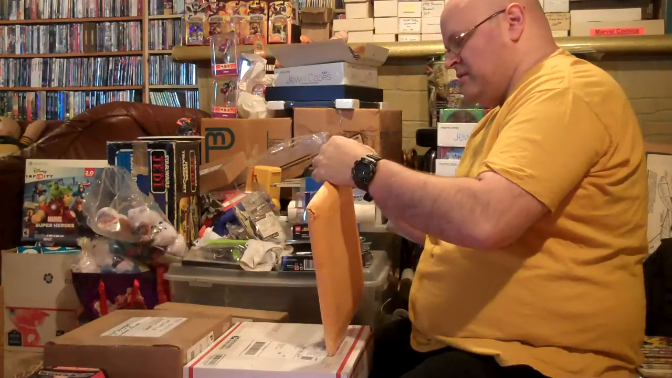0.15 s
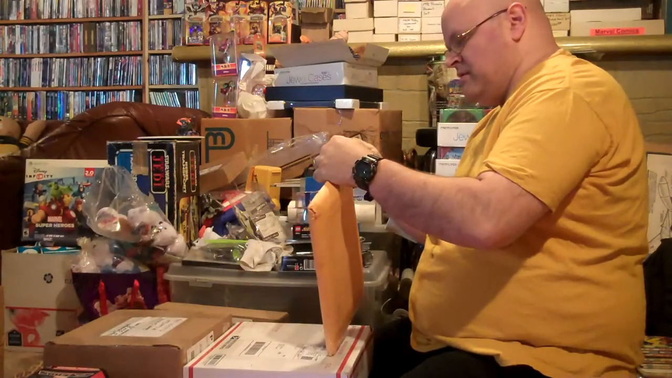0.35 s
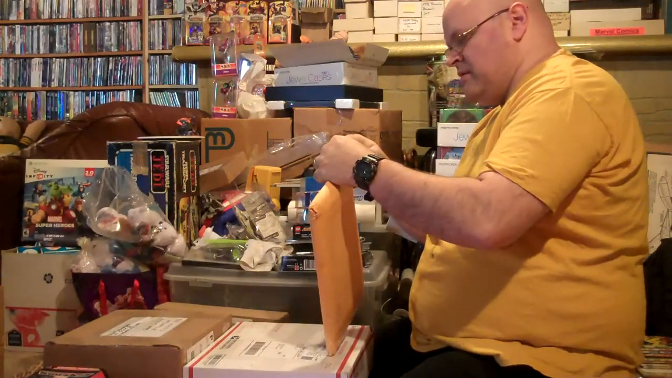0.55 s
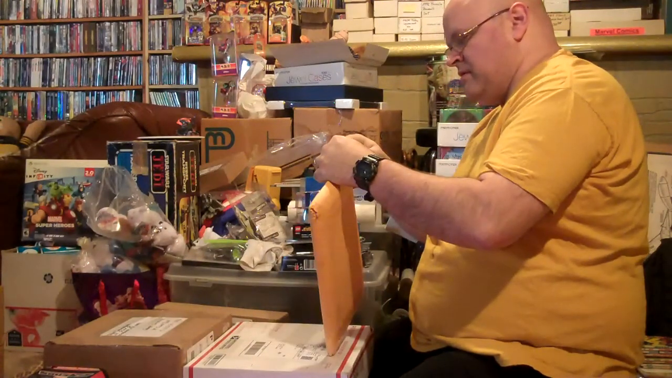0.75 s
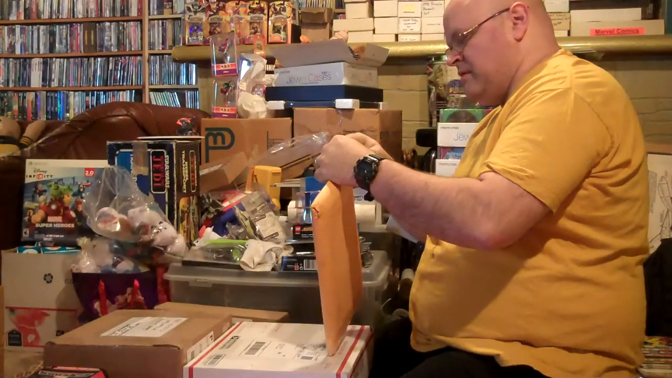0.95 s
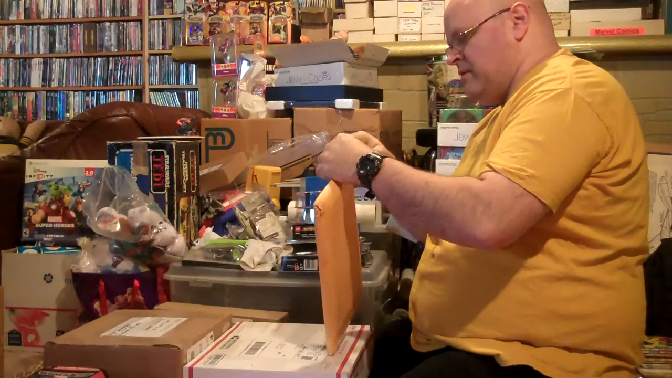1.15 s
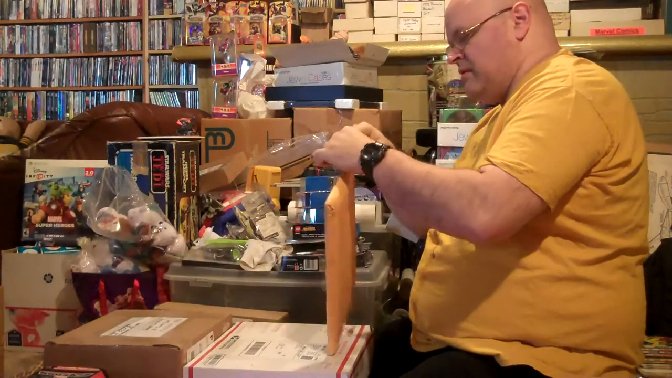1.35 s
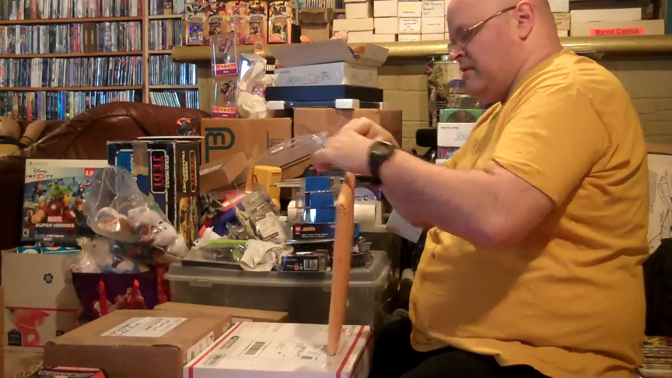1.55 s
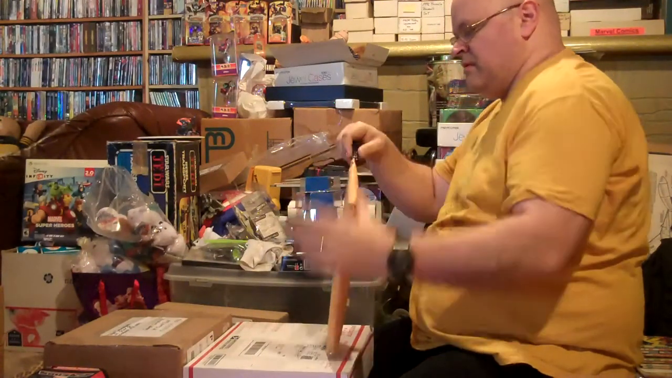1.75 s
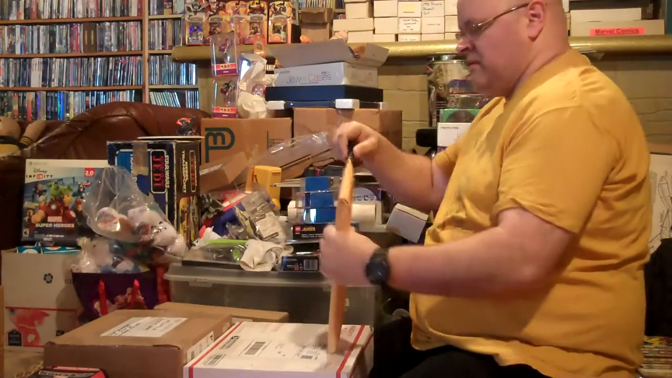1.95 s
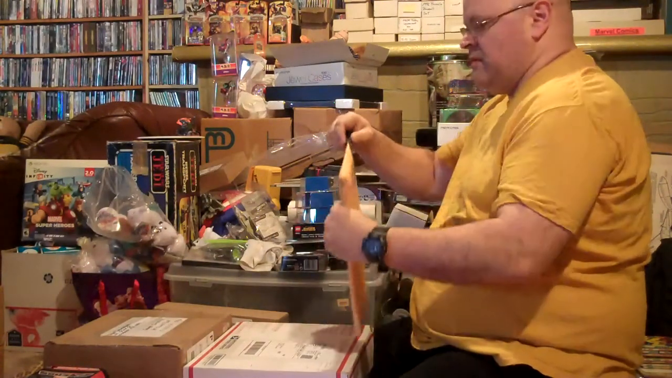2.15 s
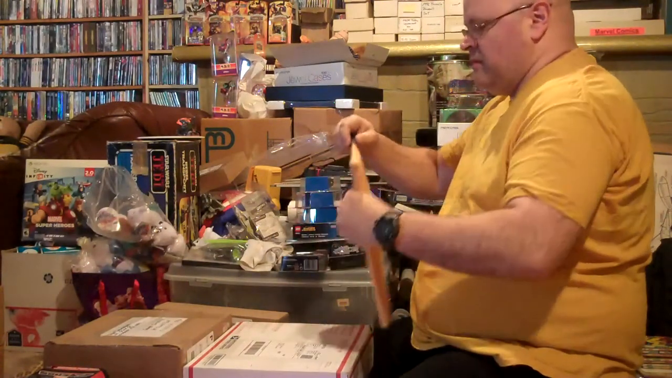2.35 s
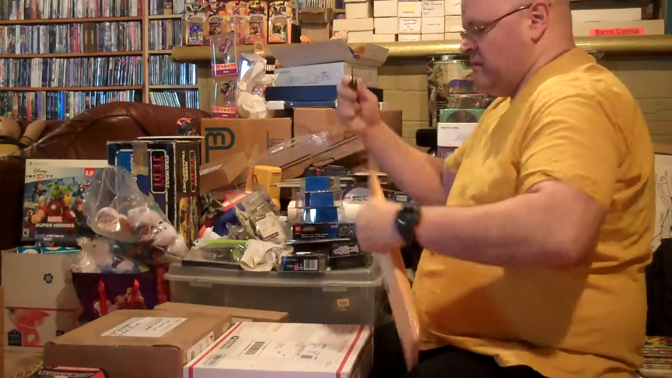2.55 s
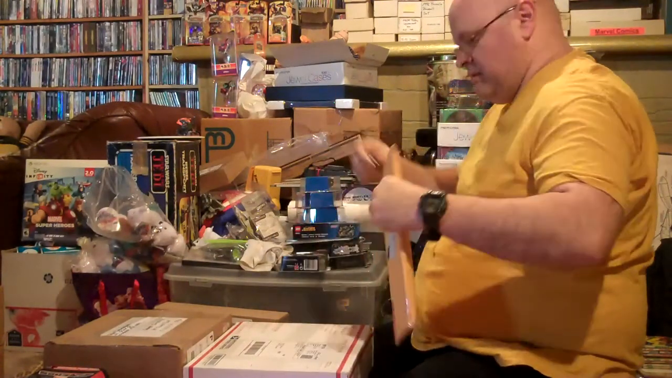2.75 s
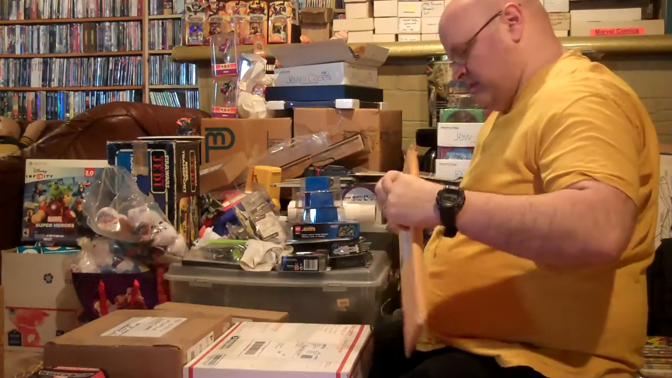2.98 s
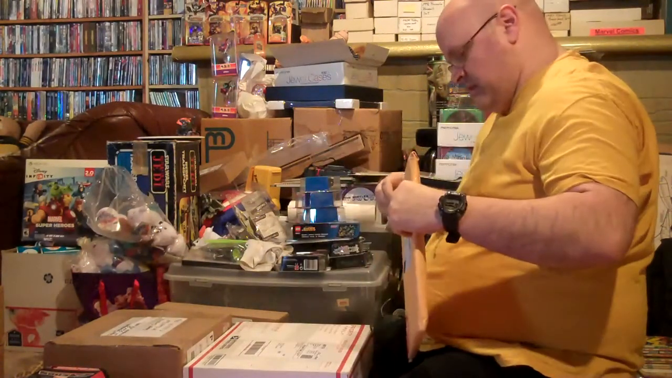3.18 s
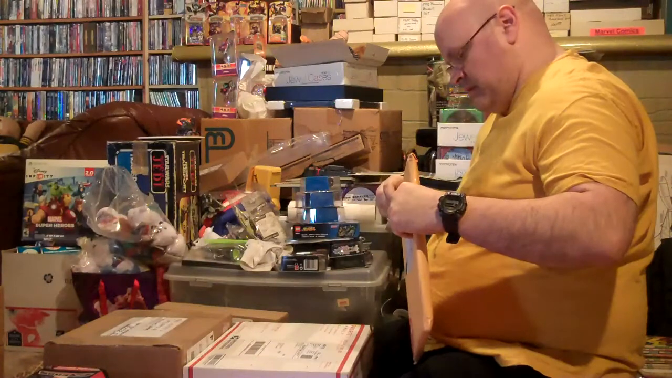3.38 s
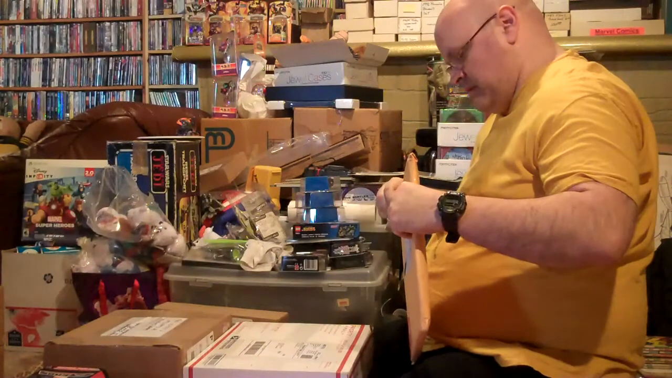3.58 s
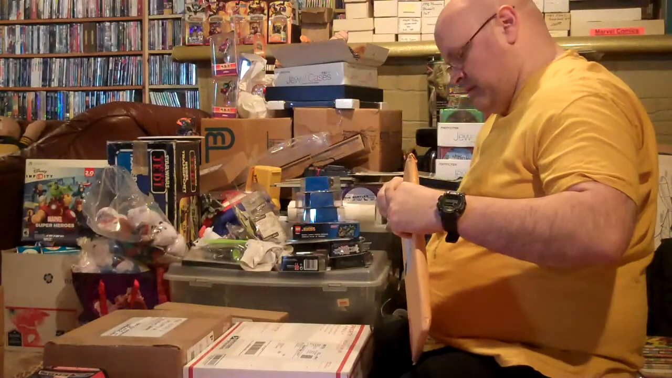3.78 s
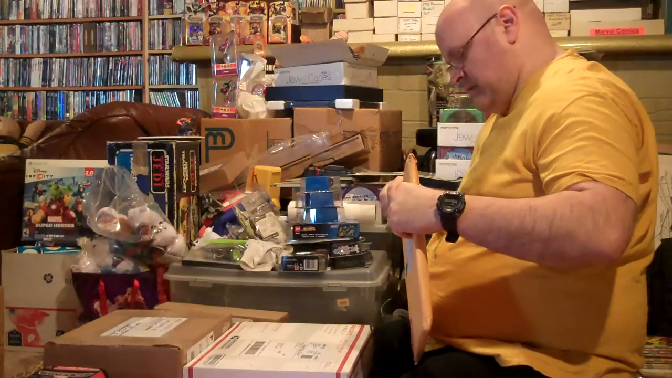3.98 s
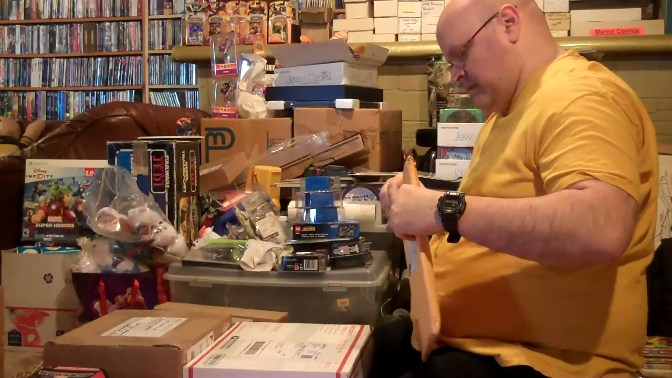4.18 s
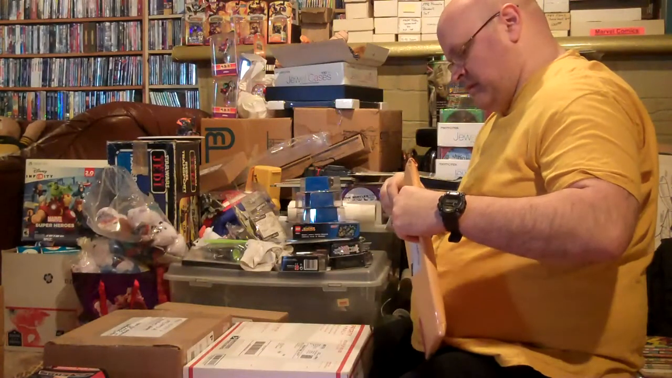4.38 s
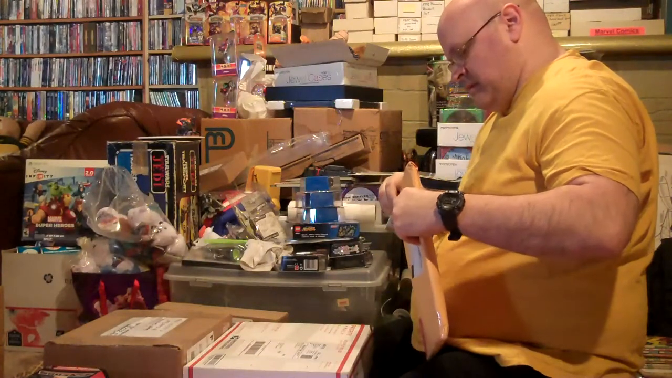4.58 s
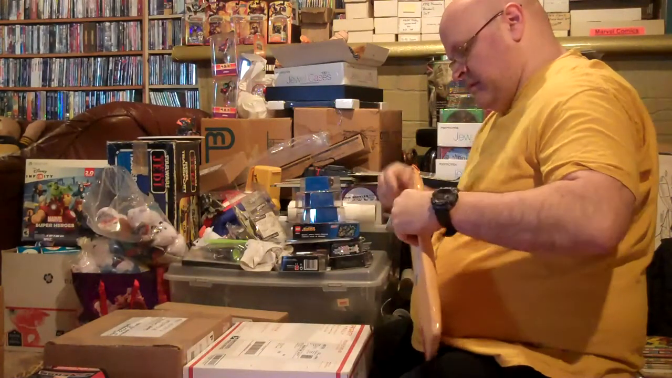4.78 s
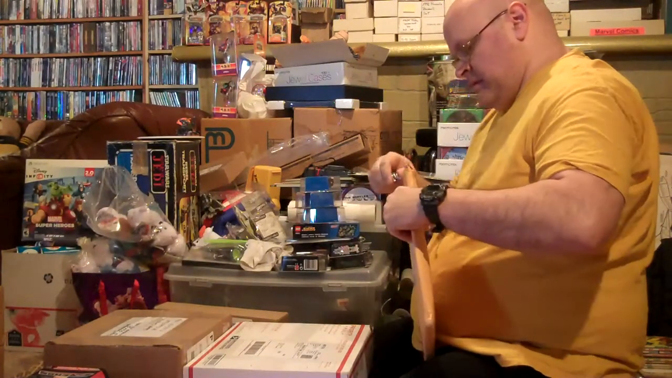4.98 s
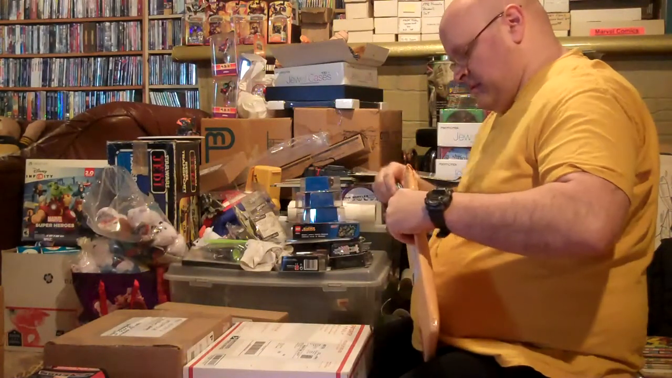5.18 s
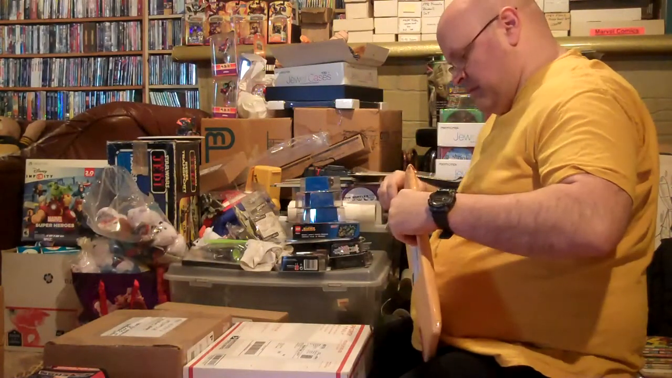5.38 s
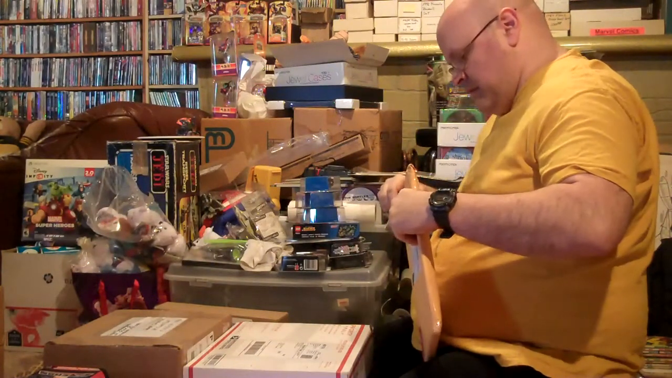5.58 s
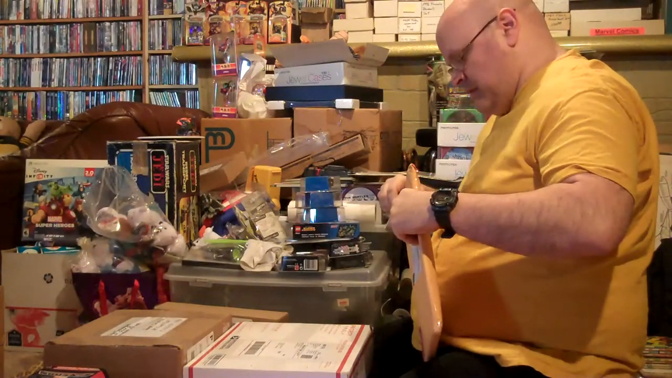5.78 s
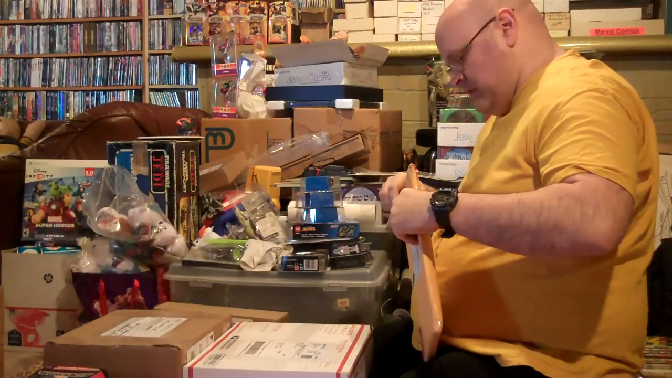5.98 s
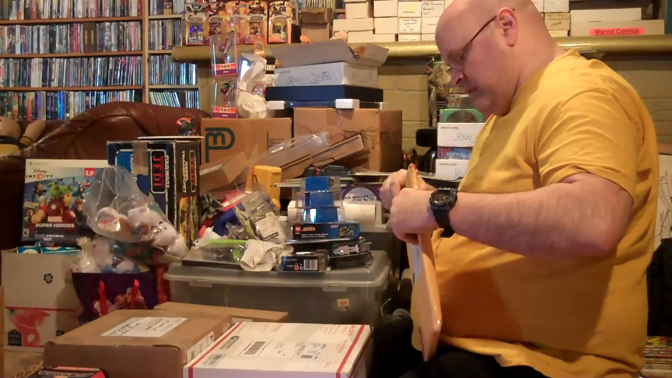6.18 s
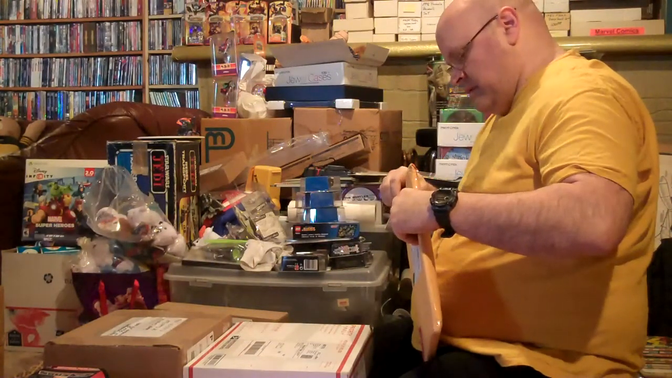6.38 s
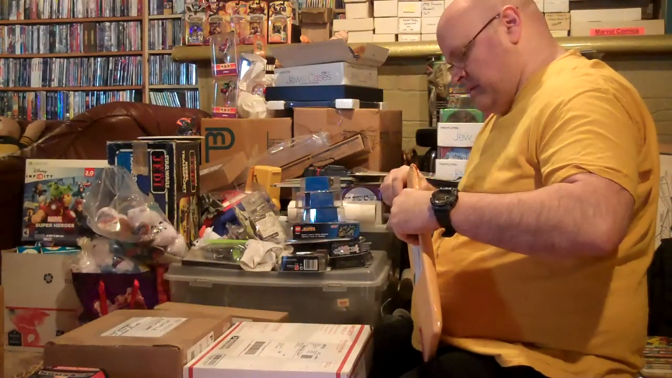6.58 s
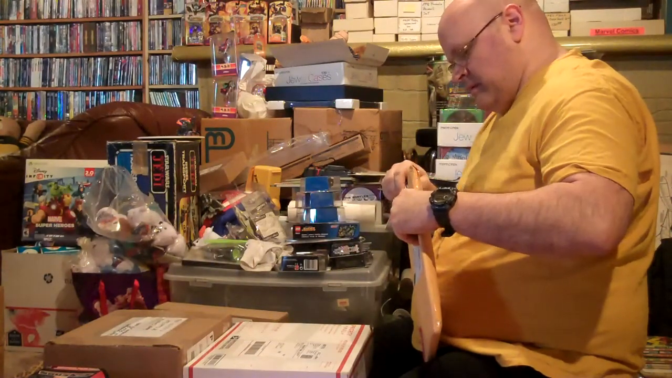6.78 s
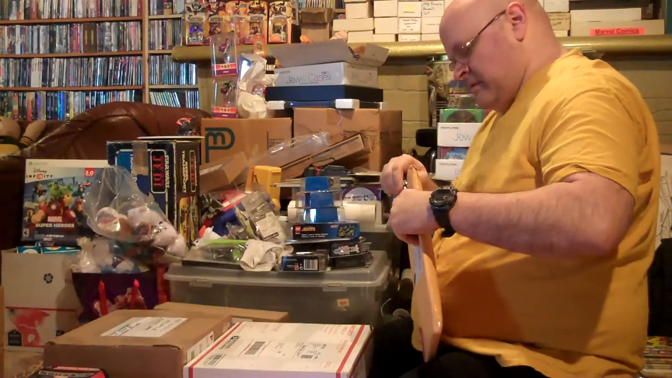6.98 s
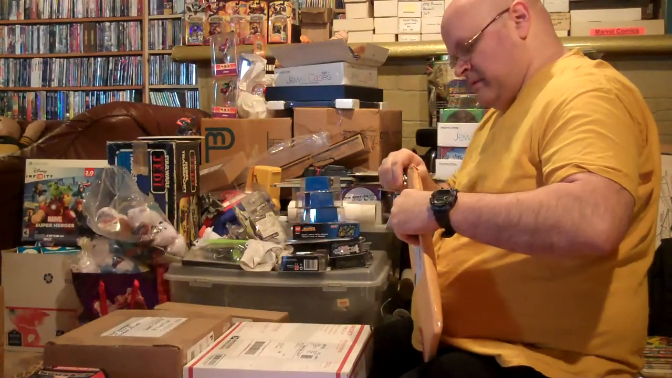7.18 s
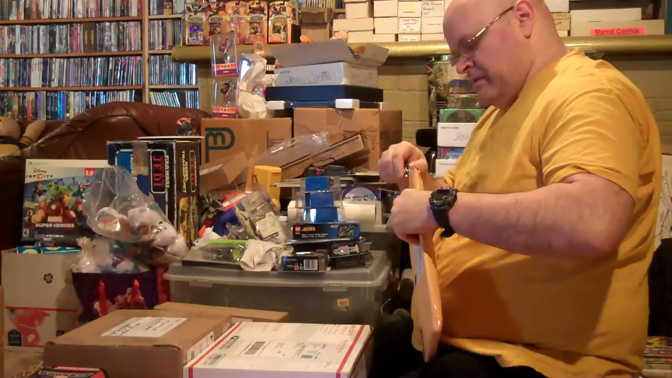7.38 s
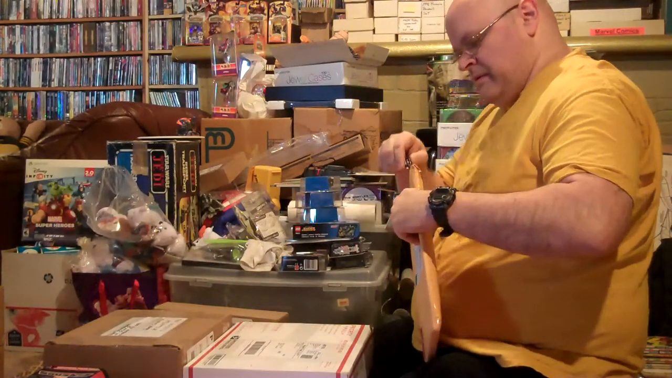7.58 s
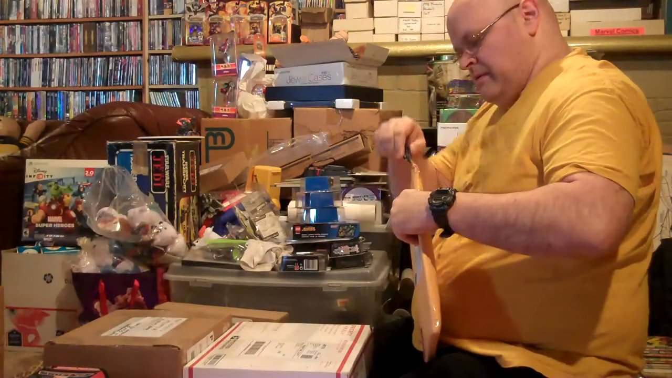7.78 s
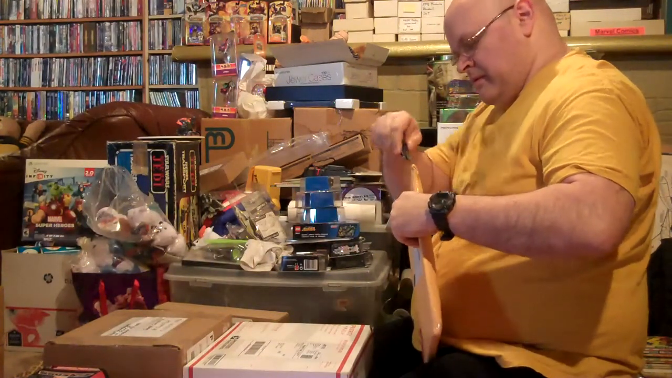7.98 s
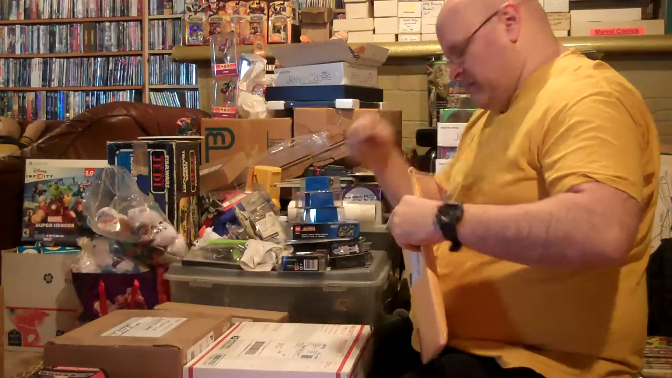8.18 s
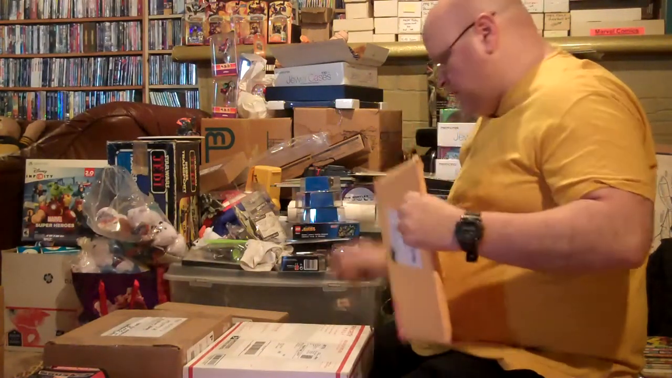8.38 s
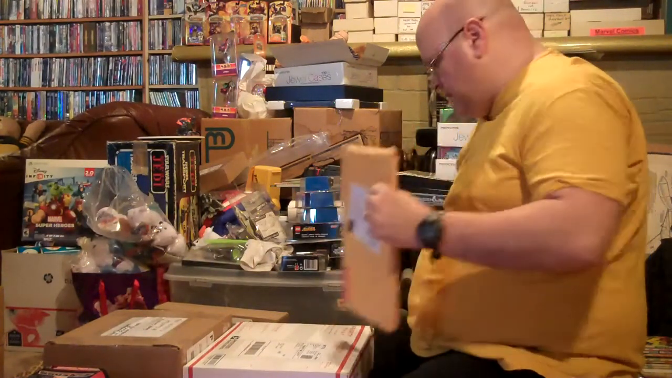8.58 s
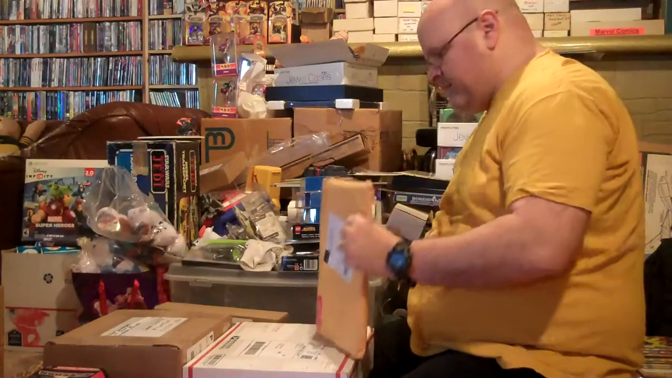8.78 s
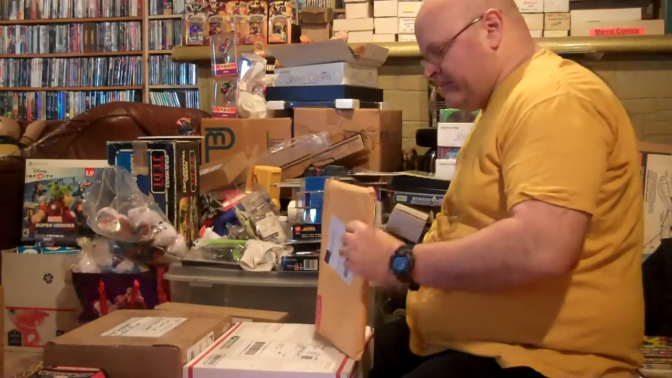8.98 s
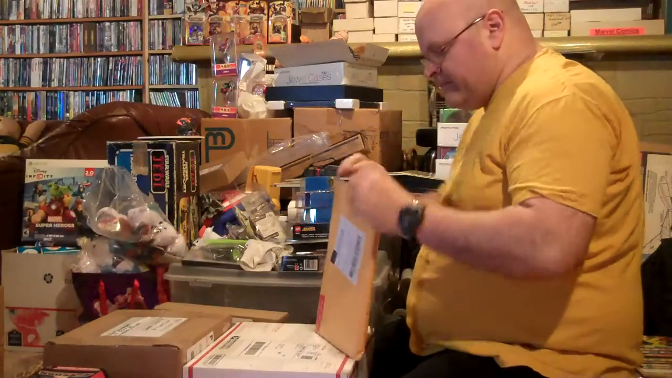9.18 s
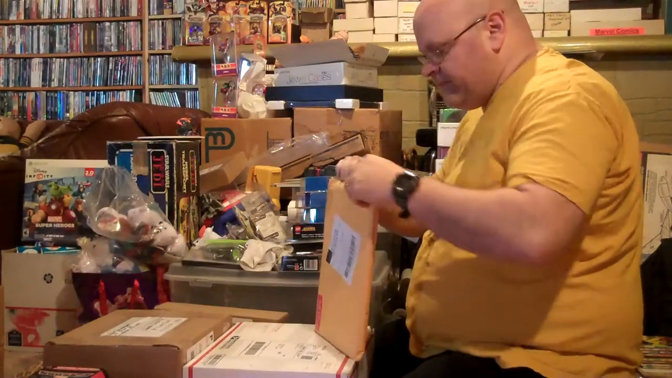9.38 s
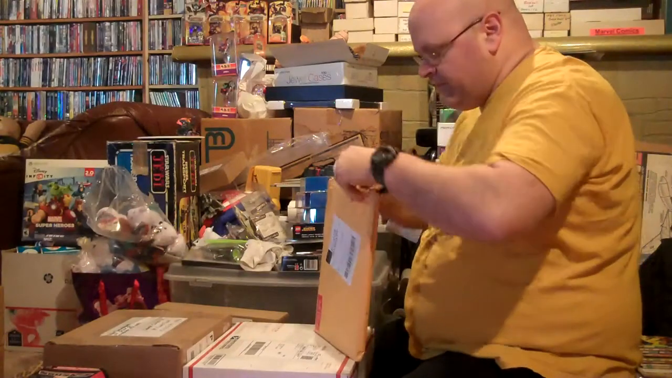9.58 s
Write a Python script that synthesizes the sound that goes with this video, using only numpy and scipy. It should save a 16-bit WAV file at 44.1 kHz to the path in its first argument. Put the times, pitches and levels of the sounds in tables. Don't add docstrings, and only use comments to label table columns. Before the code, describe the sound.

A padded paper mailer is opened within arm's reach in a small, cluttered, damped room, over faint fan hiss and a very low hum. From 0 to 1.8 s there are only light crease ticks and small rustles. Around 1.8-2.7 s it grows busy: crumples, hard knocks, a hollow bump and a very loud snap near 2.5 s. Then near quiet until 3.8 s, when soft scraping and crinkles begin. At 4.5-4.9 s a corner flicks and sharp cracks peak at 4.8 s. Soft fiddling continues, with a knock at 5.7 s. From 6.5 s rustling rises into quick ripping jerks at 6.7-7.2 s, then a dense, gritty long tear swells until 7.65 s and slackens abruptly. A last tug at 7.8 s, crumples and dull bumps to 8.5 s, a small rip near 8.9 s, and crackly handling from 9.1 to 9.5 s. Stereo, brighter left.

```python
import sys
import numpy as np
from scipy import signal
from scipy.fft import rfft, irfft, next_fast_len
from scipy.io import wavfile

SR = 44100
rng = np.random.default_rng(int(sys.argv[2]) if len(sys.argv) > 2 else 0)


def inscribe(sig):
    pcm = np.round(np.clip(np.atleast_2d(sig).T, -1, 1) * 32767)
    wavfile.write(sys.argv[1], SR, pcm.astype(np.int16))


def ratio_of_db(decibels):
    return 10 ** (np.asarray(decibels, float) / 20)


N = 425124

# pitch_hz, density_db (per Hz)
AIR = [(12, -51.5), (20, -14), (58, -15), (91, -4.5), (141, -12), (331, -4), (379, -5), (435, -9),
       (589, -6), (1500, -11.5), (2530, -11), (3070, -16), (14300, -23.5)]
AIR_DB = -62.5
# pitch_hz, likeness (-1 to 1)
AIR_LIKENESS = [(60, 0.54), (180, 0.33), (530, 0.52), (1600, -0.034), (4770, 0.19), (14200, -0.13)]
# pitch_hz, balance_db
AIR_BALANCE = [(60, 0.5), (180, 4.9), (530, 3.3), (1600, 2.8), (4770, 1.0), (14200, 1.0)]
# pitch_hz, width_hz, level_db (rms), likeness (0-1), left_over_right_db
WHINES = [(394, 10, -79.5, 1, 8), (2440, 30, -83, 0.35, -7), (7700, 40, -78, 0.12, 1.5),
          (11900, 58, -81.5, .1, 3), (7800, 900, -90.5, .01, 4.5), (6400, 570, -86, 0.0103, -1.5)]
HUM_HZ, HUM_DB = 92, -80

# pitch_hz, t60_s, tail_db (over the direct sound), likeness (0-1)
ROOM = [(196, 0.053, 3.5, 1), (400, 0.48, -4.5, 0.91), (817, 0.42, -1.5, 0.9), (1730, 0.22, -8.5, 0.65),
        (3330, 0.19, -5, 0.19), (6150, 0.18, -7.5, 0.01), (12400, 0.08, 0.5, 0.011)]
# pitch_hz, sharpness (ratio)
PORTS = [(7806, 6.72), (6670, 7.16)]
# boom_db, body_db, crackle_db
PORT_LIFT_DB = (-1.83, -2.5, 4.5)
SHADE_HZ, SHADE_DB = 8800, -19
FAR_SHADE_HZ, FAR_SHADE_DB = 12260, -4
TOP_HZ = 14600

# pitch_hz, density_db (per Hz)
PAPER = [(60, -50), (100, -38), (280, -18), (600, -9.5), (950, -9), (1350, -7.5), (1650, -2), (2500, -5),
         (4000, -6.5), (6000, -5), (7700, -9.5), (9000, -11), (10500, -13.5), (14000, -11.5)]
# pitch_hz, width_hz, level_db
SHEET_MODES = [(130, 13, 1), (387, 3.5, 7), (870, 22, -2), (1650, 95, -16.5), (2570, 230, -3.5)]
# low_hz, high_hz
BANDS_HZ = [(90, 1200), (1200, 3500), (3500, 16000)]

# start_s, peak_db, pitch_hz, t60_s
THUMPS = [
    (2.035, -51, 150, 0.11),
    (2.635, -51, 280, 0.084),
    (4.532, -27.5, 1615, 0.019),
    (4.79, -56.5, 140, .15),
    (8.301, -40.5, 510, 0.05),
    (8.377, -47.5, 171, 0.067),
    (8.098, -41, 617, 0.043),
]
# pitch_hz, width_hz, level_db, start_s, end_s
FLAP_MODES = [
    (388, 36, -63, 6.72, 6.95),
    (394, 35, -61.5, 7.3, 7.5),
    (280, 44, -69.5, 7.2, 7.95),
    (1450, 290, -55, 6.7, 6.79),
    (1656, 130, -46, 7.2, 7.6),
    (2520, 110, -39.5, 7.55, 7.66),
    (2900, 82, -39.5, 7.33, 7.45),
    (1700, 130, -33, 7.81, 7.87),
]

# start_s, peak_db, body_db (over the peak)
TICKS = [(0.977, -34.5, -9), (2.022, -11, -24), (2.338, -25.5, -27), (7.966, -34, -15), (2.27, -28.5, -21),
         (2.918, -45, -8), (3.092, -45.5, -13), (3.026, -35.5, -25), (4.279, -40, -19),
         (4.492, -49.5, -17.5), (4.5469, -46, -29), (4.6846, -23, -4), (7.797, -31.5, -14),
         (7.2005, -39, -25), (9.349, -29, -25), (9.478, -40, -32), (9.4908, -28, -22)]
# start_s, peak_db, body_db (over the peak), panel_hz
CREASES = [(0.217, -37.5, -5.5, 2860), (0.5929, -26.5, -14.5, 1900), (0.672, -47, -2, 3140),
           (1.07, -37, -5.5, 2580), (1.2084, -33, -3.5, 1330), (1.439, -40, -11, 1770),
           (1.4847, -33, -6, 2000), (1.853, -21.5, -10.5, 2020), (2.243, -39, -19, 2540),
           (2.5057, -1.5, -6, 2560), (3.898, -35.5, -9, 1680), (4.1143, -31.5, -11, 2760),
           (4.3176, -31.5, -13, 2900), (4.4094, -29.5, -9, 1900), (4.532, -40, 6.5, 1530),
           (4.6142, -30, -3, 2040), (6.482, -37, -10, 1390), (6.497, -33, -11, 1410),
           (8.375, -31, 5.5, 1410), (9.362, -28, -17, 2300), (9.539, -23, -6, 2570)]
# start_s, peak_db, body_db (over the peak), panel_hz
KNOCKS = [(1.372, -44, 2, 3100), (1.392, -36, -2, 2600), (1.548, -43, -14, 921), (1.9616, -24, 0, 1320),
          (2.032, -10, -12.5, 1740), (2.098, -32.5, 2.5, 2260), (2.1225, -40.5, 4, 770),
          (2.163, -39, -10, 690), (2.398, -32, 2.5, 1450), (2.4672, -13.5, -7, 982), (2.5135, -7, -9, 1990),
          (2.517, -8, -5, 2430), (2.605, -23, 1, 1750), (3.604, -45.5, -14, 920), (4.591, -35, -4, 2080),
          (4.6356, -35, 8, 1380), (4.7329, -11.5, -13, 1700), (5.029, -49, 6, 525), (5.681, -47, 9.5, 1240),
          (5.732, -25.5, -5.5, 2360), (5.722, -38.5, 1.5, 3100), (8.096, -20.5, -1, 2630),
          (8.262, -49.5, 8, 1460), (8.2856, -49, -12, 1850), (8.3, -35.5, 10.5, 1740)]
# start_s, peak_db, body_db (over the peak), panel_hz, length_s
RIPS = [(0.686, -38, -10.5, 3130, 0.028), (1.328, -36.5, -5, 2070, 0.02), (1.939, -34.5, -8, 1980, 0.029),
        (2.509, -12.5, -4.5, 2560, 0.011), (2.026, -24, 1.5, 1710, 0.026), (4.7445, -16.5, -7, 2760, 0.054),
        (4.809, -1.5, -9.5, 2980, 0.027), (6.673, -20.5, -18, 1900, 0.038),
        (6.829, -21.5, -7.5, 2400, 0.023), (7.004, -25.5, -4, 2740, 0.018),
        (7.103, -18, -13.5, 1620, 0.031), (8.0438, -33, -10, 2470, 0.016), (8.86, -32, -7.5, 2100, 0.021),
        (8.867, -23, -17, 2660, 0.075), (6.718, -15, -11.5, 1450, 0.019), (7.666, -18, -13, 1730, 0.01),
        (7.68, -13.5, -11.5, 1730, 0.0158), (9.367, -25.5, -9.5, 2570, 0.012)]
# start_s, peak_db, body_db (over the peak), panel_hz, length_s
CRUMPLES = [
    (1.827, -26.5, -4.5, 2500, 0.024),
    (1.959, -24, -7, 1330, 0.053),
    (2.013, -23.5, 0.5, 1500, 0.011),
    (2.52, -25.5, -12, 2500, 0.027),
    (2.629, -21, -9, 1340, 0.015),
    (4.69, -28, 0, 1014, 0.01),
    (7.8156, -18.5, -5, 1700, 0.035),
    (8.0594, -31, -18, 1620, 0.036),
    (8.364, -39, 3.5, 1400, 0.0176),
    (9.071, -39, -13.5, 805, 0.052),
]
# boom_db (over the peak), body_share (dB per dB of body)
BOOMS = [(-13, 3.7), (-11, 2), (-5.5, 1.41), (-14.5, 1.15), (-3, 2)]
BOOM_DB_PER_OCTAVE = 2.0
TICK_HZ = 2300
TICK_S, CREASE_S, KNOCK_S = .002, .0035, .0028
RING_DB, RING_FOLLOWS = 7.0, 1.2
RING_WIDTH = 0.17
FIRST_CRACK = 5.0
SWELL, STOP = .12, 5

# start_s, end_s, first_db, last_db (crackle), body_db (over crackle)
STROKES = [(8.474, 8.84, -65.5, -64.5, -7), (0.98, 1.19, -58.5, -49.5, -3), (1.27, 1.412, -53.5, -57, -2),
           (2.254, 2.323, -52, -57.5, -2), (2.362, 2.369, -45.5, -45, -1), (2.46, 2.504, -47.5, -33.5, 1),
           (2.542, 2.678, -47, -49, -5), (2.7, 2.79, -77, -70, -8), (3.815, 4.141, -57.5, -51, -3),
           (4.306, 4.356, -53.5, -51.5, -5), (4.496, 4.64, -56, -50.5, -7), (4.731, 4.902, -38, -42, -5.5),
           (4.93, 5.1, -47, -63, -8.5), (5.612, 5.615, -66.5, -61, -5), (5.827, 5.857, -56.5, -61.5, -8),
           (5.968, 6.386, -56.5, -52.5, -8.5), (6.522, 6.657, -48, -37, -5.5),
           (7.875, 8.01, -36, -59.5, -10.5), (8.081, 8.113, -42, -48, 0), (8.267, 8.55, -48, -73, -23),
           (9.091, 9.194, -49.5, -46, -11), (9.231, 9.319, -43, -47.5, -4.5),
           (9.343, 9.42, -49, -54.5, -5.5), (9.477, 9.53, -54, -53, -6.5)]
RISE_DB_PER_S, FALL_DB_PER_S = 258.5, 327
# start_s, end_s, first_db (crackle), body_db (over crackle)
JERKS = [
    (0.0, 0.026, -61.5, -10),
    (1.205, 1.27, -44.5, -8.5),
    (6.691, 6.826, -31, -5.5),
    (6.825, 6.912, -33.5, -6),
    (6.904, 6.977, -34, -6.5),
    (6.996, 7.096, -31, -8.5),
    (7.102, 7.193, -36, -7.5),
    (7.812, 7.86, -43, -1),
]
JERK_SAG_DB_PER_S = 54
# time_s, pull_db (crackle)
TEAR = [
    (7.21, -32),
    (7.3, -29.5),
    (7.45, -29),
    (7.57, -28.5),
    (7.648, -26),
    (7.662, -40),
    (7.71, -40),
    (7.766, -51),
]
TEAR_BODY_DB = -7.5
# boom_db, body_db, crackle_db
REST_DB = (-79.5, -73.5, -72.5)
BOOM_FOLLOWS = 0.67
LOOSE_DB, LOOSE_TOP_DB, LOOSE_DB_PER_S, LOOSE_BODY = -19.5, -49, 297, .4


def rms_one(x):
    return x / np.sqrt(np.mean(x ** 2) + 1e-20)


def at_hz(points, hz):
    points_hz, values = np.transpose(points)
    return np.interp(np.log(np.maximum(hz, 1)), np.log(points_hz), values)


def causal(db_at_hz, size=2048):
    cepstrum = irfft(db_at_hz(np.fft.rfftfreq(size, 1 / SR)) * np.log(10) / 20)
    cepstrum[1:size // 2] *= 2
    cepstrum[size // 2 + 1:] = 0
    return irfft(np.exp(rfft(cepstrum)))


def band(x, low_hz, high_hz, order=3):
    edges = [low_hz, min(high_hz, .45 * SR)]
    return signal.sosfilt(signal.butter(order, edges, "band", fs=SR, output="sos"), x)


def resonate(x, hz, width_hz):
    r = np.exp(-np.pi * width_hz / SR)
    zeros = [(1 - r * r) / 2, 0, (r * r - 1) / 2]
    poles = [1, -2 * r * np.cos(2 * np.pi * hz / SR), r * r]
    return signal.lfilter(zeros, poles, x)


def drift(rate_hz):
    r = np.exp(-64 * np.pi * rate_hz / SR)
    slow = signal.lfilter([1], [1, -2 * r, r * r], rng.standard_normal(N // 32 + 2002))
    slow = slow[2000:]
    return np.interp(np.arange(N) / 32, np.arange(len(slow)), rms_one(slow))


def grains(size, per_s, spread_db):
    born = rng.random(size) < per_s / SR
    strength = ratio_of_db(spread_db * np.minimum(rng.exponential(1, size), 3))
    return born * strength * rng.choice([-1, 1], size)


def alike_pair(alike, size):
    mid, side = rng.standard_normal((2, size)) + 1j * rng.standard_normal((2, size))
    alike = np.clip(alike, -1, 1)
    return np.sqrt(1 + alike) * mid + np.sqrt(1 - alike) * side * [[1], [-1]]


def air():
    size = next_fast_len(N, True)
    hz = np.fft.rfftfreq(size, 1 / SR)
    ears = np.array([[.5], [-.5]])
    shape = ratio_of_db(at_hz(AIR, hz) + at_hz(AIR_BALANCE, hz) * ears)
    shape = shape / np.sqrt(np.sum(shape ** 2) / 2)
    out = ratio_of_db(AIR_DB + 3.0) * alike_pair(at_hz(AIR_LIKENESS, hz), len(hz)) * shape
    for whine_hz, width_hz, db, alike, pan_db in WHINES:
        shape = 1 / (1 + (2 * (hz - whine_hz) / width_hz) ** 2)
        shape = shape / np.sqrt(np.sum(shape ** 2))
        out += ratio_of_db(db + pan_db * ears) * alike_pair(alike, len(hz)) * shape
    scale = size / np.sqrt(8)
    return irfft(out * scale, size)[:, :N]


def mains_hum():
    level = ratio_of_db(HUM_DB + 3.5 + .6 * drift(4))
    phase = 2 * np.pi * np.cumsum(HUM_HZ + 0.68 * drift(2)) / SR
    return level * np.sin(phase)


def tail():
    t, out = np.arange(SR // 2) / SR, 0
    for hz, t60, db, alike in ROOM:
        noises = rng.standard_normal((2, len(t)))
        mid, side = band(noises, hz / np.sqrt(2), hz * np.sqrt(2), order=2)
        alike = np.clip(alike, -1, 1)
        pair = np.sqrt(1 + alike) * mid + np.sqrt(1 - alike) * side * [[1], [-1]]
        fade = ratio_of_db(-60 * t / t60) * np.minimum(t / 0.001, 1)
        out = out + ratio_of_db(db) * pair * fade / np.sqrt(np.sum(fade ** 2))
    return out


def room(x, ports, count=3):
    shares = ratio_of_db(18.0 * np.array([drift(12.4) for _ in range(count)]))
    shares = shares / np.sqrt(np.sum(shares ** 2, axis=0))
    size = next_fast_len(N + SR, True)
    direct = rfft(x, size)
    echoes = sum(rfft(x * share, size) * rfft(tail(), size) for share in shares)
    return irfft((direct + echoes) * rfft(ports, size), size)[:, :N]


def port(port_hz, sharpness, shade_db):
    def shelf(hz, edge_hz):
        return 1 / (1 + (edge_hz / np.maximum(hz, 1)) ** 6)

    def response_db(hz):
        ratio = hz / port_hz
        ring = -10 * np.log10((1 - ratio ** 2) ** 2 + (ratio / sharpness) ** 2)
        far = FAR_SHADE_DB / SHADE_DB * shelf(hz, FAR_SHADE_HZ)
        return ring + shade_db * (shelf(hz, SHADE_HZ) + far)

    return causal(response_db)


def thumps():
    out, t = np.zeros(N), np.arange(4096) / SR
    for s, db, hz, t60 in THUMPS:
        swing = np.minimum(hz * t, 1) * np.sin(2 * np.pi * hz * t)
        out[round(s * SR):][:4096] += ratio_of_db(db - 60 * t / t60) * swing
    return out


def flap():
    t, clicks, out = np.arange(SR) / SR, grains(SR, 4000, 3.1), np.zeros(N)
    for hz, width, db, start, end in FLAP_MODES:
        fade = np.clip(np.minimum(t, end - start - t) / 0.03, 0, 1)
        level = ratio_of_db(db + 2.5 * drift(15)[:len(t)])
        ring = resonate(resonate(clicks, hz, width), hz, width)
        out[round(start * SR):][:len(t)] += fade * level * rms_one(ring)
    return out


def paper_colour(hz):
    bumps = sum(ratio_of_db(db) ** 2 / (1 + ((hz - centre) / width) ** 2) for centre, width, db in SHEET_MODES)
    return at_hz(PAPER, hz) + 10 * np.log10(1 + bumps)


def buckles():
    ticks = [(*row, TICK_HZ, TICK_S) for row in TICKS]
    folds = [(*row, CREASE_S) for row in CREASES]
    knocks = [(*row, KNOCK_S) for row in KNOCKS]
    rows = []
    for kind, (kind_boom_db, share) in zip((ticks, folds, knocks, RIPS, CRUMPLES), BOOMS):
        for s, db, body_db, hz, length in kind:
            boom_db = kind_boom_db + share * body_db + BOOM_DB_PER_OCTAVE * np.log2(1800 / hz)
            rows.append((s, db, body_db, boom_db, hz, length))
    return rows


def creases():
    s, peak_db, body_db, boom_db, panel_hz, length = np.transpose(buckles())
    t, out = np.arange(4096) / SR, np.zeros(N + 4096)
    part_done = t / np.maximum(length, .001)[:, None]
    bursts = np.array([grains(4096, 9000, 4.9) for _ in s])
    bursts *= ratio_of_db(-9 * part_done ** STOP) * (1 - np.exp(-part_done / SWELL))
    bursts[:, 0] = FIRST_CRACK * (length < .01)
    cracks = signal.fftconvolve(bursts, causal(paper_colour)[None], axes=1)[:, :4096]
    rings = [ratio_of_db(RING_DB + RING_FOLLOWS * db) * resonate(crack, hz, RING_WIDTH * hz)
             for crack, hz, db in zip(cracks, panel_hz, body_db)]
    cracks += np.array(rings)
    starts = np.round(s * SR).astype(int)
    levels_db = (peak_db + boom_db, peak_db + body_db, peak_db)
    for edges, db, lift_db in zip(BANDS_HZ, levels_db, PORT_LIFT_DB):
        gains = ratio_of_db(db - lift_db - 3.5)
        for at, part, gain in zip(starts, band(cracks, *edges), gains):
            out[at:at + 4096] += gain * part / np.abs(part).max()
    return out[:N]


def pull():
    t = np.arange(0, N + 64, 64) / SR

    def edges(start, end):
        return -RISE_DB_PER_S * np.maximum(start - t, 0) - FALL_DB_PER_S * np.maximum(t - end, 0)

    s, db = np.transpose(TEAR)
    moves = [(np.interp(t, s, db) + edges(s[0], s[-1]), TEAR_BODY_DB)]
    for start, end, first_db, last_db, body_db in STROKES:
        stroke = np.interp(t, [start, end], [first_db, last_db]) + edges(start, end)
        moves.append((stroke, body_db))
    for start, end, first_db, body_db in JERKS:
        sag = first_db - JERK_SAG_DB_PER_S * (t - start) + edges(start, end)
        moves.append((np.where(t < start, -200, sag), body_db))
    for start, peak_db, body_db, *_ in buckles():
        loose = min(peak_db + LOOSE_DB, LOOSE_TOP_DB) - LOOSE_DB_PER_S * (t - start)
        moves.append((np.where(t < start, -200, loose), LOOSE_BODY * body_db))
    rest_boom, rest_body, rest_crackle = REST_DB
    crackle = np.maximum(np.max([db for db, _ in moves], axis=0), rest_crackle)
    body = np.maximum(np.max([db + body_db for db, body_db in moves], axis=0), rest_body)
    boom = rest_boom + BOOM_FOLLOWS * (body - rest_body)
    return [np.interp(np.arange(N) / SR, t, level) for level in (boom, body, crackle)]


def fibres():
    clumps = ratio_of_db(1.8 * drift(50))
    clicks = grains(N, 12000 * clumps, 2.9)
    dealt = rng.integers(0, 20, N)
    patches = np.zeros(N)
    for k, hz in enumerate(np.geomspace(130, 13500, 20)):
        awake = ratio_of_db(2.9 * drift(3.8) + 2.2 * drift(13))
        patches += awake * resonate(clicks * (dealt == k) + 1e-18, hz, 0.25 * hz)
    cracks = grains(N, 1500 * clumps, 1.7)
    breaks = rms_one(patches) + ratio_of_db(-7.5) * rms_one(cracks)
    sheet = signal.fftconvolve(breaks, causal(paper_colour))[:N]
    out = np.zeros(N)
    for db, lift_db, edges in zip(pull(), PORT_LIFT_DB, BANDS_HZ):
        out += ratio_of_db(db - lift_db - 4.5) * rms_one(band(sheet, *edges))
    return out


def scene():
    left = ratio_of_db(0.73) * port(*PORTS[0], 0)
    right = port(*PORTS[1], SHADE_DB)
    mailer = fibres() + flap() + creases() + thumps()
    return room(mailer, np.array([left, right])) + air() + mains_hum()


def low_pass(x):
    return signal.sosfilt(signal.butter(12, 14840, fs=SR, output="sos"), x)


def record(dry):
    late = np.array([np.roll(dry[0], 1), dry[1]])
    bent = .95 * np.tanh(late / .95) - late
    overload = band(bent, 150, 20000, order=2)
    top_cut = signal.cheby2(12, 35, TOP_HZ, fs=SR, output="sos")
    mix = signal.sosfilt(top_cut, late + overload)
    return low_pass(mix)


dry = scene()
out = record(dry)
inscribe(out)
```